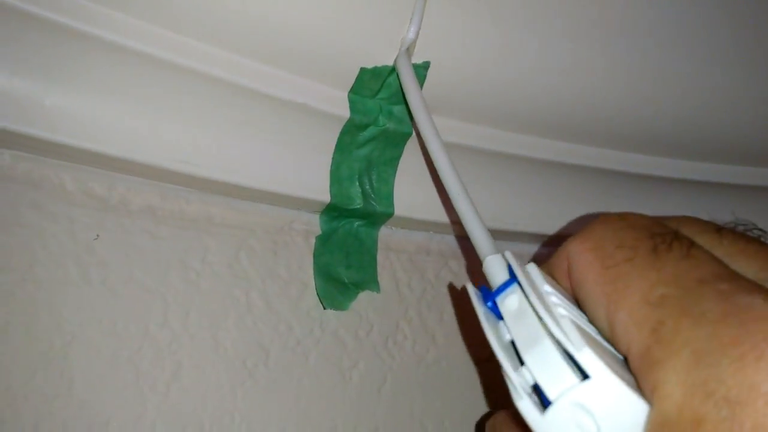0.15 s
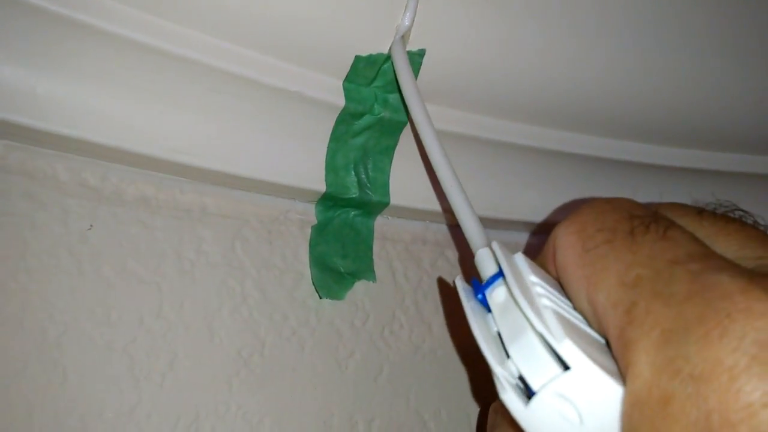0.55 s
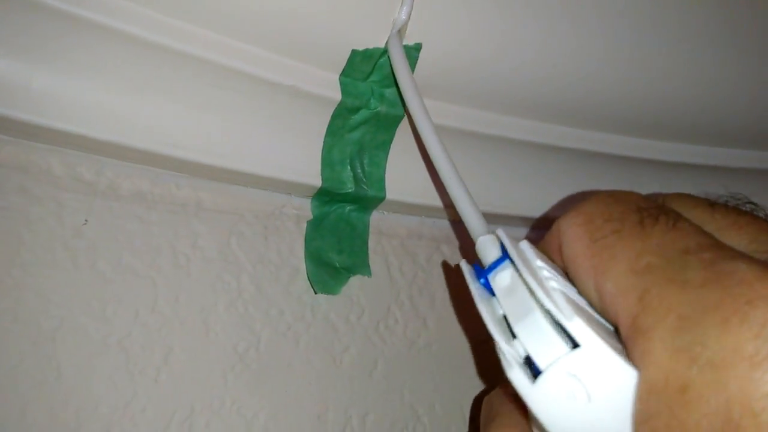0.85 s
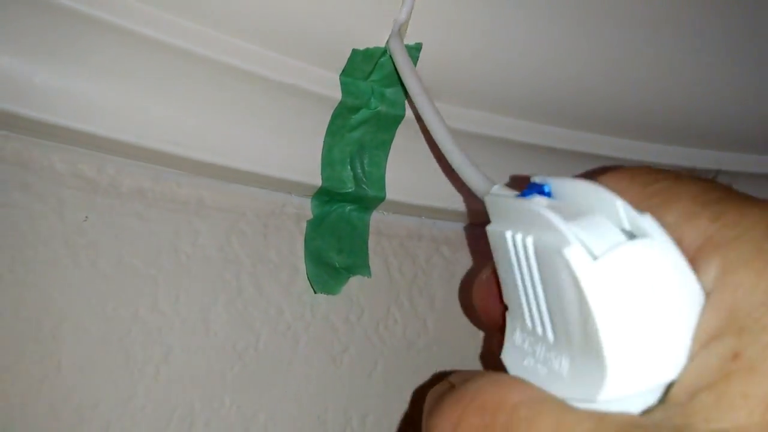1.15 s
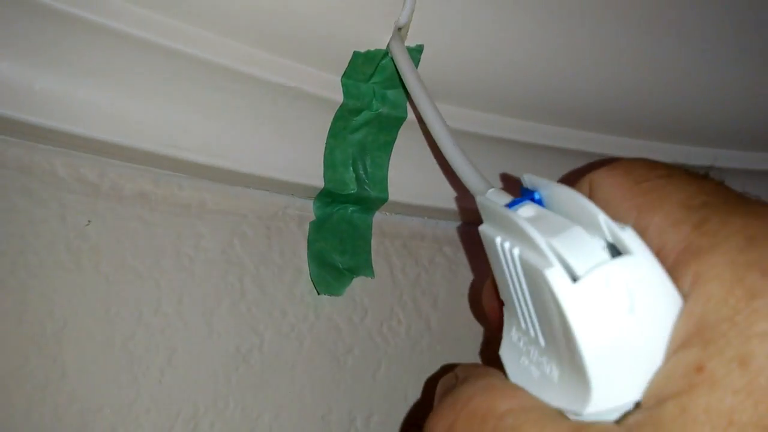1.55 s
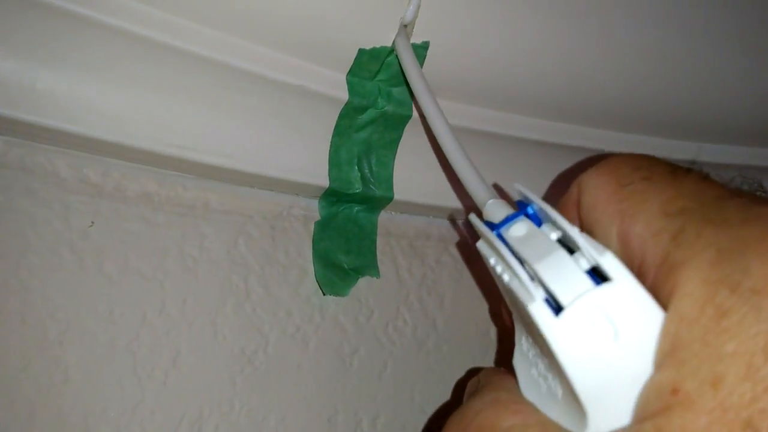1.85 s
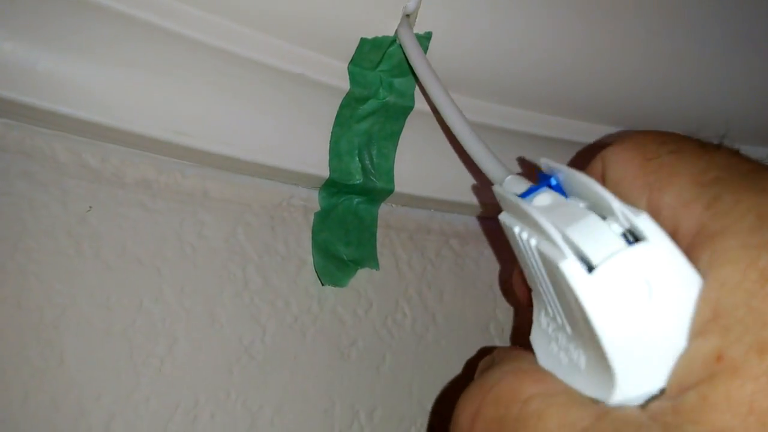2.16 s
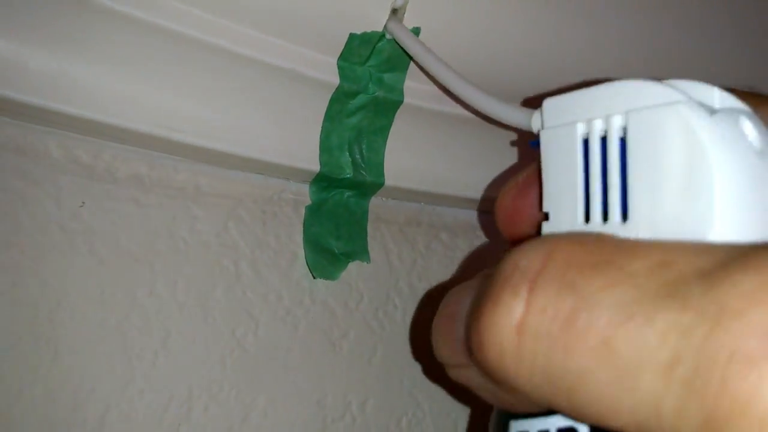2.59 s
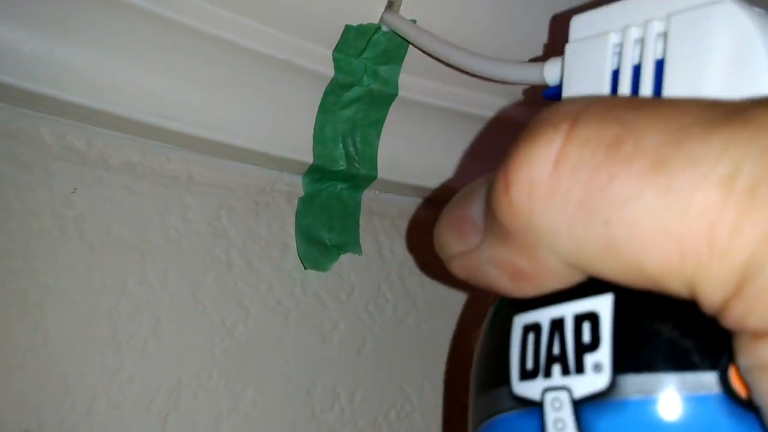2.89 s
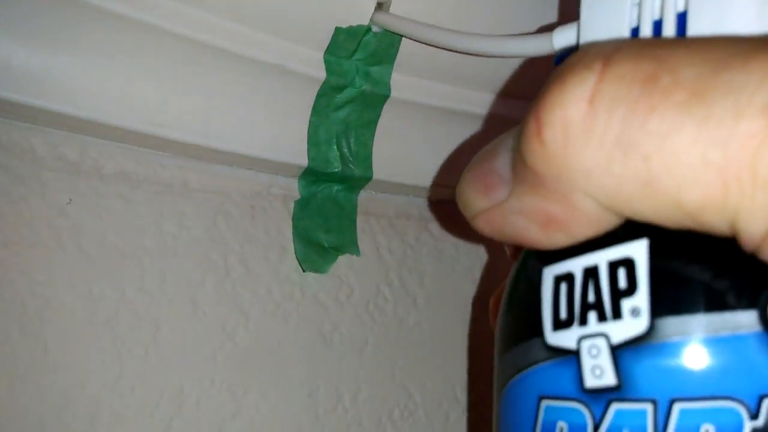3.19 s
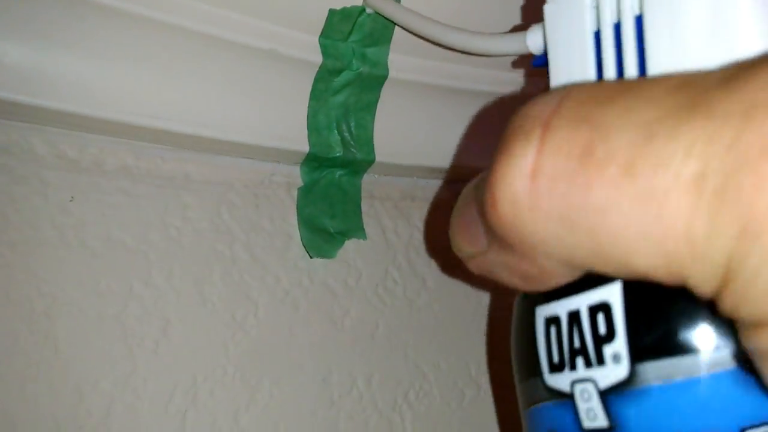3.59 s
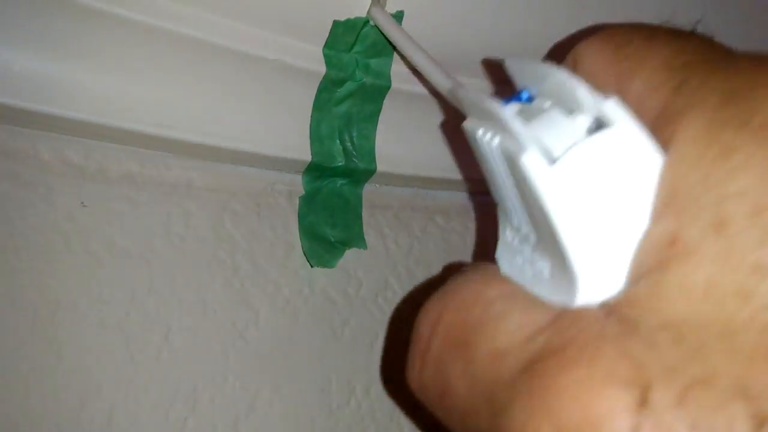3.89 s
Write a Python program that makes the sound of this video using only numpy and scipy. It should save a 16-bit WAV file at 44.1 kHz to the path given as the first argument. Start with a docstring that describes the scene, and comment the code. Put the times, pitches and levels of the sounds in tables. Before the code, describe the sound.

A quiet room is heard through a close handheld stereo microphone: soft low rumble, faint air hiss and steady, slowly beating appliance hums. At about 0.4 s a dull, small plastic tick comes with a light bump. Around 1.03 to 1.11 s the trigger gives a quick cluster of sharper clicks over low thumps, followed by a barely audible seep of gas near 1.3 s. Near 2.3 to 2.4 s another cluster clicks and thuds more firmly. Two faint short hisses slip out around 2.7 s, then a tiny tick at 2.86 s. At 3.0 s a click and the strongest low thump open the valve. Within a tenth of a second, bright gas hiss bursts out, fluttering and crackling with irregular wet spits through a thin straw, while a hollow in the wall builds a resonant mid-low roar. The rush holds, uneven, with a soft bump near 4.0 s, through the end.

```python
"""A quiet room with humming appliances. A hand works the plastic trigger of a foam can, which ticks and thumps,
with a few faint short hisses. Near 3 s the valve opens and, to the end, gas and foam rush through a thin straw
into a hollow in the wall: the hollow roars while the straw tip hisses and spits.
Noise makes the air, gas and cracks; resonances make the shell, tip and hollow ring; sines make hums and thumps.
A handheld microphone pair listens close by."""
import sys
import numpy as np
from scipy import signal
from scipy.fft import rfft, irfft
from scipy.io import wavfile
from scipy.ndimage import uniform_filter1d

SR = 44100
rng = np.random.default_rng(int(sys.argv[2]) if len(sys.argv) > 2 else 0)


def invert_db(level):
    """Linear amplitude ratio for a level in decibels (20 dB per decade), elementwise."""
    return 10 ** (np.asarray(level, dtype=float) / 20)


def master(y):
    """Save y as 16-bit WAV."""
    cut = np.clip(np.atleast_2d(y).T, -1, 1)
    pcm = np.round(cut * 32767)  # scale
    wavfile.write(sys.argv[1], SR, pcm.astype(np.int16))


N = 178016
T = np.arange(N) / SR
HZ = np.fft.rfftfreq(N, 1 / SR)

# reflected share of the close sounds across the pair: (frequency [Hz], level [dB])
NEAR_SIDE = [(100, 7), (400, -12.5), (900, -8), (1300, -11.5), (1900, -6), (2500, -6), (3300, 0),
             (3900, -20), (4500, 1.5), (5500, 0), (8000, -2), (9300, 7), (10500, -4), (15000, 2.5)]
# left over right for the close sounds: (frequency [Hz], level [dB])
NEAR_LEAN = [(100, 0), (400, 5), (1300, -1), (2400, 4.5), (3900, -1), (5000, 0), (7000, -.5), (8000, 7.5),
             (9200, -5), (10200, -7.5), (12500, -7.5), (13700, -2), (15000, -10)]
# whistle band of the straw tip: (time [s], frequency [Hz])
TIP_WHISTLE = [(3.03, 6900), (3.15, 7260), (3.3, 7200), (3.5, 7400), (3.8, 7450), (3.88, 6400),
               (4.04, 6600)]


def evened(x):
    """Scales to rms 1."""
    return x / np.sqrt(np.mean(x ** 2) + 1e-20)


def read(points, hz):
    """Reads a table on a log-frequency axis."""
    f, value = np.transpose(points)
    return np.interp(np.log(hz + 1), np.log(f + 1), value)


def shaped(x, gain):
    """Filters by a smooth gain over frequency."""
    return irfft(rfft(x) * gain, N)


def ring(x, modes):
    """Sums resonances (frequency [Hz], width [Hz], gain at the centre [dB]) with alternating signs."""
    out = np.zeros_like(x)
    for k, (hz, width, db) in enumerate(modes):
        b, a = signal.iirpeak(min(hz, SR / 2.2), hz / width, SR)
        out += (-1) ** k * invert_db(db) * signal.lfilter(b, a, x)
    return out


def burst(s, rise, fall, t=T):
    """Envelope that swells to 1 at time s and dies exponentially."""
    u = t - s
    return np.where(u < 0, np.exp(-(u / rise) ** 2), np.exp(-np.maximum(u, 0) / fall))


def wander(seconds):
    """Smooth random curve of rms 1; longer seconds make it slower."""
    width = max(round(seconds * SR), 1)
    once = uniform_filter1d(rng.standard_normal(N), width)
    return evened(uniform_filter1d(once, width))


def placed(direct, reflected, side, lean, lag=0):
    """Left and right from a direct part and an unrelated reflected part; the left lags by lag radians."""
    across = shaped(reflected, invert_db(read(side, HZ)))
    tilt = invert_db(read(lean, HZ) / 2) * np.exp(-.5j * lag)
    return np.array([shaped(direct + across, tilt), shaped(direct - across, 1 / tilt)])


def add(mix, s, db, rise, fall, modes, top_hz=18000):
    """Adds a short puff of noise that rings the modes, peaking near db; a soft contact fades above top_hz."""
    lead_s = .004  # room for the swell before the peak
    t = T[:2048]
    drive = burst(lead_s, rise, fall, t) * rng.standard_normal((2, 2048))
    softness = signal.butter(2, min(top_hz, SR / 2.2), fs=SR)
    puff = ring(signal.lfilter(*softness, drive), modes)
    # the peak is taken as 2.5 times the loudest millisecond
    peak = 2.5 * np.sqrt(uniform_filter1d((puff ** 2).mean(0), size=44).max())
    part = mix[:, round((s - lead_s) * SR):][:, :2048]
    part += (invert_db(db) * puff / peak)[:, :part.shape[1]]


def room_air():
    """Noise from all around, split near 900 Hz into a rumble and a hiss that drift on their own."""
    # colour of the room air and microphone hiss: (frequency [Hz], relative level [dB])
    air_colour = [(15, 0.5), (30, -9), (65, -8.5), (100, -3), (188, -5), (300, -7.5), (614, -14),
                  (1050, -18), (2000, -20), (4000, -23.5), (7000, -24.5), (9400, -22), (11000, -25),
                  (15500, -25)]
    # course of the noise, before its fast drift: (time [s], rumble [dB], hiss [dB])
    air_level = [(0.0, -64, -65.5), (1.01, -63.5, -65.5), (1.19, -58, -64), (1.55, -61.5, -64),
                 (1.85, -60.5, -64), (2.21, -66.5, -66), (2.38, -57.5, -64.5), (2.75, -65, -62.5),
                 (3.0, -56, -64)]
    # left over right: (frequency [Hz], level [dB])
    air_lean = [(60, 4), (400, 1.5), (1500, 0.2), (6500, 1), (8000, -1), (9500, -8), (10500, -9),
                (12000, -2.5), (15000, 0)]
    s, rumble_db, hiss_db = np.transpose(air_level)
    low = 1 / (1 + (HZ / 900) ** 2)
    air = shaped(rng.standard_normal((2, N)), invert_db(read(air_colour, HZ)))
    rumble = evened(shaped(air, low)) * invert_db(np.interp(T, s, rumble_db) + 1.2 * wander(.03))
    hiss = evened(shaped(air, 1 - low)) * invert_db(np.interp(T, s, hiss_db) + 0.64 * wander(0.011))
    return placed(*(rumble + hiss), [(100, -0.19), (10000, -0.55)], air_lean)


def hums():
    """Appliance hums: each a sine of slightly unsteady phase, beating with a close neighbour."""
    # (frequency [Hz], level without the beat [dB], beat depth [held to 0-1], beats [per s], time of a crest [s])
    hum_tones = [(42.5, -62, 0.1, 0.73, 1.13), (85.6, -58.5, 0.63, 0.18, 3.94), (123, -66, 0.06, .9, 0.26),
                 (240.3, -66.5, 1.1, 0.857, 0.69), (312, -73.5, 0.2, 0.98, 0.24),
                 (354, -70.5, 0.94, 0.873, 0.43), (484, -72, 0.05, 1, 1.57),
                 (1045.4, -71.5, 0.16, 0.52, 1.33), (1362, -76.5, 0.64, 0.16, 3.25),
                 (1473, -85, 1, 0.32, 2.5)]
    out = np.zeros((2, N))
    sides = np.array([[-1], [1]])
    for hz, db, depth, beat, crest in hum_tones:
        phase = 2 * np.pi * (hz * T + rng.random() + 0.0098 * wander(0.56))
        swell = 1 + np.clip(depth, 0, 1) * np.cos(2 * np.pi * beat * (T - crest))
        apart = 20 / hz + 0.28 + 0.32 * wander(0.41)  # half the phase between the ears [radians]
        out += invert_db(db) * swell * np.sin(phase + sides * apart)
    return out


def room():
    """The quiet room: moving air and humming appliances."""
    return room_air() + hums()


def trigger_ticks():
    """Each tick is a puff of cracks that rings the plastic shell, with a brief answer from the walls."""
    # (time [s], peak [dB], strongest ring [Hz], time for the cracks to fall 60 dB [s], top of the contact [Hz])
    tick_list = [(0.3941, -40, 2100, 0.0018, 1800), (1.033, -48, 1850, .004, 1800),
                 (1.0771, -32.5, 3340, 0.0087, 4970), (1.1074, -50, 3970, .025, 9000),
                 (1.1135, -35, 4400, 0.0092, 16000), (2.2934, -47, 1900, 0.0037, 2000),
                 (2.343, -47.5, 1940, 0.026, 4000), (2.3654, -29.5, 2050, 0.0049, 2800),
                 (2.387, -38.5, 2000, 0.025, 16000), (2.857, -51.5, 1700, .006, 7000),
                 (3.0004, -37.5, 2170, 0.014, 4000)]
    # resonances of the trigger shell: (frequency [Hz], width [Hz], gain [dB])
    shell_modes = [(900, 700, -14), (2100, 700, -4), (3800, 1000, -8), (6800, 1300, -7), (9600, 1600, -8),
                   (13500, 4000, -15)]
    ticks = np.zeros((2, N))
    for s, db, hz, t60, top_hz in tick_list:
        # the struck part rings loudest, at its own pitch
        struck = np.argmin([abs(np.log(mode[0] / hz)) for mode in shell_modes])
        shell = [(hz, 500, 0) if k == struck else mode for k, mode in enumerate(shell_modes)]
        add(ticks, s, db, 0.00032 + 0.091 * t60, t60 / np.log(1000), shell, top_hz)
    # the walls' answer falls at 60 dB in 0.17 s
    tail = rng.standard_normal((2, 4096)) * invert_db(-38.0 - 60 * T[:4096] / 0.17)
    ticks += signal.oaconvolve(ticks, tail, axes=1)[:, :N]
    return placed(*ticks, NEAR_SIDE, NEAR_LEAN)


def hand_jolts():
    """Each jolt rings the can and hand in a few decaying low tones, nearer the left port."""
    # jolts through the hand: (time [s], strength [dB], rise [s])
    jolt_list = [(0.3945, -52, 0.00084), (1.0528, -40.5, 0.0041), (1.07, -32.5, 0.0023),
                 (1.078, -32.5, 0.0004), (2.3475, -28.5, 0.0048), (2.36, -43, .0015),
                 (2.368, -37.5, 0.00065), (2.9993, -19.5, 0.00047), (4.021, -34, 0.0011)]
    # resonances of can and hand: (frequency [Hz], gain [dB], time to fall 60 dB [s])
    grip_modes = [(149, -1, 0.057), (197, -15, 0.5), (225, -4, 0.036), (453, -6.5, 0.043),
                  (745, -18, 0.004)]
    jolts = np.zeros(N)
    for s, db, rise in jolt_list:
        for hz, mode_db, t60 in grip_modes:
            recoil = np.pi / 2 * (hz == grip_modes[0][0])  # the heavy lowest mode swings back first
            reach = np.exp(-(0.95 * hz * rise) ** 2)  # a slow push does not reach the high modes
            envelope = burst(s, rise, t60 / np.log(1000))
            tone = np.cos(2 * np.pi * hz * (T - s) + recoil)
            jolts += invert_db(db + mode_db) * reach * envelope * tone
    return jolts * invert_db(np.array([[-3], [-9]]))


def trigger():
    """The worked trigger: ticks of the plastic and thumps through the hand."""
    return trigger_ticks() + hand_jolts()


def hollow(noise):
    """Gas blows the hollow like a bottle: a first puff reaches it, then the roar builds up and holds."""
    # resonances of the hollow: (frequency [Hz], width [Hz], gain [dB])
    hollow_modes = [(191, 35, -14), (334.6, 19, -2.5), (380, 19.3, -1), (440.3, 32.7, 2.5),
                    (494, 103, -3.5), (637, 46, -2), (670.5, 18, -2.5), (734, 32, -7.5), (863, 120, -12),
                    (1118, 140, -11), (1188, 78, -9), (1351, 110, -12), (1956, 224, -11.5)]
    built = 1 - np.exp(-np.maximum(T - 3.06, 0) / 0.099)  # start [s], build-up [s]
    steady = built * invert_db(-39.5 + wander(0.022))  # swells by 1 dB rms
    puff = invert_db(-40.5) * burst(3.076, rise=0.0057, fall=0.016)
    gusts = (steady + puff) * invert_db(0.71 * wander(0.006))
    return ring(noise * gusts, hollow_modes) / np.std(ring(noise, hollow_modes))


def jet(noise):
    """Hiss whose colour drifts in patches, with a brighter band that follows the shape of the tip."""
    # colour of the hiss: (frequency [Hz], relative level [dB])
    hiss_colour = [(200, -35), (1000, -63), (2000, -1), (2600, 2.5), (3050, -11), (3800, -0.5),
                   (4400, -6.5), (5500, -2), (6200, -8), (7450, -6), (7900, -12), (8600, -14), (10000, -13),
                   (15000, -14)]
    hz, t, z = signal.stft(noise, SR, nperseg=256)
    patches = rng.standard_normal(z.shape[1:])
    patches = uniform_filter1d(patches, size=4, axis=0)
    patches = evened(uniform_filter1d(patches, size=14, axis=1))
    whistle_hz = np.interp(t, *np.transpose(TIP_WHISTLE))
    whistle = np.exp(-((hz[:, None] - whistle_hz) / 350) ** 2)
    colour_db = read(hiss_colour, hz)[:, None] + 6 * whistle + 2.24 * patches
    return evened(signal.istft(z * invert_db(colour_db), SR, nperseg=256)[1][:, :N])


def tip_hiss(noise):
    """Turbulent gas at the tip: faint seeps, then a fluttering rush once the valve opens."""
    # gas flow once the valve opens: (time [s], hiss level before the flutter [dB])
    gas_flow = [(3.03, -60), (3.04, -56), (3.056, -46), (3.07, -45.5), (3.086, -38), (3.115, -42.5),
                (3.18, -48), (3.235, -47), (3.3, -42), (3.45, -44.5), (3.61, -47.5), (3.64, -41.5),
                (3.67, -45.5), (3.82, -46.5), (4.036, -47.5)]
    # faint short hisses: (time [s], level [dB], half length [s])
    seep_list = [(1.293, -67, 0.034), (2.716, -59.5, 0.019), (2.766, -61.5, 0.017)]
    s, hiss_db = np.transpose(gas_flow)
    opened = np.clip((T - s[0]) / 0.012, 0, 1)
    # foam and gas take turns in the straw
    flutter = invert_db(2 * wander(.001) + .9 * wander(.006))
    # small bubbles burst at random, about 220 a second
    pops = (rng.random(N) < 220 / SR) * np.minimum(rng.exponential(0.44, N), 1.8)
    flutter *= 1 + np.convolve(pops, signal.windows.hann(81), "same")
    level = opened * invert_db(np.interp(T, s, hiss_db)) * flutter
    for at, db, half in seep_list:
        level += invert_db(db) * np.exp(-((T - at) / half) ** 2)
    return level * jet(noise)


def spits():
    """Foam spits ring the tip: the loud ones in turn, small ones at random at or below the whistle band."""
    # the loudest spits, before the last filter: (onset [s], peak [dB], high ring [Hz])
    loud_spits = [(3.0835, -25, 6810), (3.0878, -25.5, 7000), (3.1044, -27, 6840), (3.1714, -29, 7300),
                  (3.1854, -32.5, 7400), (3.245, -30, 7250), (3.265, -26.5, 6100), (3.2863, -25, 6440),
                  (3.2994, -35, 7470), (3.3064, -31, 7270), (3.3139, -24.5, 6700), (3.3313, -33, 6060),
                  (3.3427, -32, 7200), (3.3613, -28.5, 6140), (3.4114, -35, 7200), (3.4246, -25, 7060),
                  (3.4394, -34, 7350), (3.465, -29, 6000), (3.5329, -28.5, 7200), (3.5504, -31.5, 7400),
                  (3.6257, -37, 7290), (3.634, -28, 6850), (3.6444, -28, 7320), (3.7264, -33, 7280),
                  (3.743, -30, 7370), (3.7564, -30, 7510), (3.7863, -31, 7340), (3.8034, -28, 7280),
                  (3.8282, -29, 7440), (4.0008, -30.5, 6700)]
    swell_s, fall_s = .0013, 0.0022  # onset to peak, and the fall after it
    low_ring_db, first_low_ring_db = -11, 4
    straw_filled_s = 3.13  # the lower rings are strong until the straw has filled
    count, small_per_s = 36, 40
    gap, size, off = rng.random((count, 3)).T
    at = straw_filled_s + (np.arange(count) + gap) / small_per_s
    small_db = -44.5 - 5.5 * np.log(1 - .9 * size)  # many faint, few stronger
    small_hz = np.interp(at, *np.transpose(TIP_WHISTLE)) - 900 * off ** 2
    out = np.zeros((2, N))
    for s, db, ring_hz in [*loud_spits, *zip(at, small_db, small_hz)]:
        unfilled = 1 / (1 + np.exp((s - straw_filled_s) / .01))
        low_db = low_ring_db + (first_low_ring_db - low_ring_db) * unfilled
        tip = [(2400, 800, low_db), (3850, 750, low_db), (ring_hz, 1200, 0), (10000, 6000, -10)]
        add(out, s + swell_s, db, swell_s, fall_s, tip)
    # the rings end in a cliff near 7800 Hz
    return shaped(out, 0.46 + 0.84 / (1 + np.exp((HZ - 7800) / 150)))


def spray():
    """Gas hisses at the tip, foam spits there, and the jet makes the hollow roar."""
    # how far the left port lags: (frequency [Hz], phase [radians])
    near_lag = [(100, 0.39), (350, 0.62), (900, 0.18), (1250, .01)]
    noise = rng.standard_normal((2, 2, N))
    close = tip_hiss(noise[0]) + spits() + hollow(noise[1])
    return placed(*close, NEAR_SIDE, NEAR_LEAN, read(near_lag, HZ))


def scene():
    """All sources at the microphone pair."""
    return room() + trigger() + spray()


def low_pass(x):
    """Removes everything above the highest recorded frequency."""
    return signal.sosfilt(signal.butter(12, 15760, fs=SR, output="sos"), x)


def record(dry):
    """The spaced ports comb the sum and the difference in turn, and the microphone band ends at 15300 Hz."""
    # depth of the comb between the ports: (frequency [Hz], depth [0-1])
    comb_depth = [(300, -.1), (700, 1), (1300, 0.92), (2650, 0.91), (4000, 0.17), (5300, 0.72),
                  (8000, 0.43), (10000, 0.19), (15000, 0.05)]
    comb = np.clip(read(comb_depth, HZ), -.99, .99) * np.cos(2 * np.pi * HZ / 2667)  # spacing [Hz]
    band = 1 / (1 + np.exp((HZ - 15300) / 60))
    mid = shaped(dry[0] + dry[1], band * np.sqrt(1 - comb)) / 2
    side = shaped(dry[0] - dry[1], band * np.sqrt(1 + comb)) / 2
    return low_pass(np.array([mid + side, mid - side]))


dry = scene()
out = record(dry)
master(out)
```